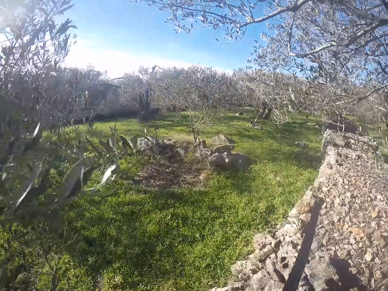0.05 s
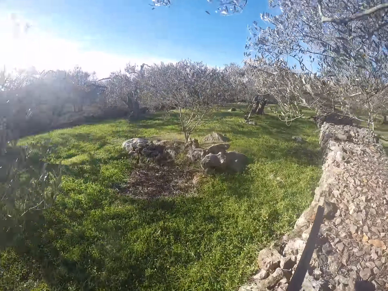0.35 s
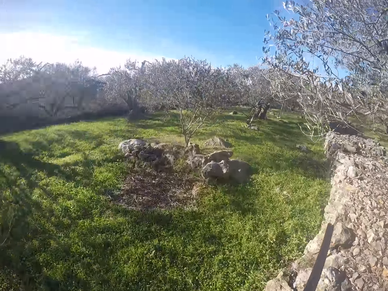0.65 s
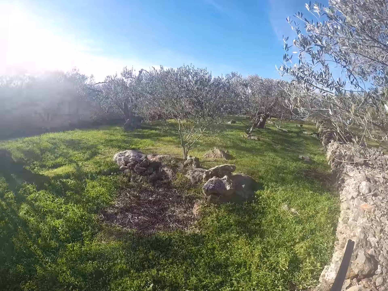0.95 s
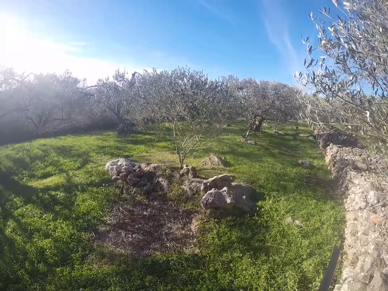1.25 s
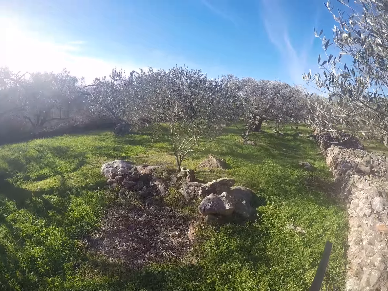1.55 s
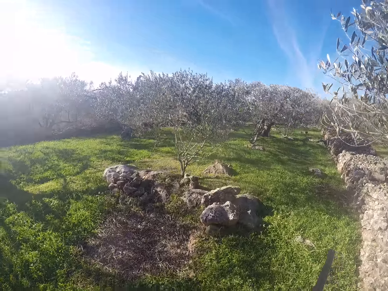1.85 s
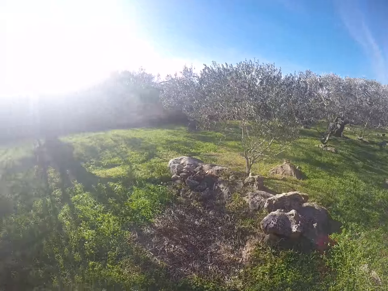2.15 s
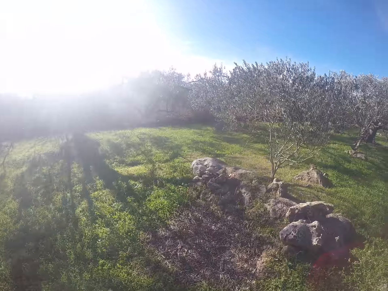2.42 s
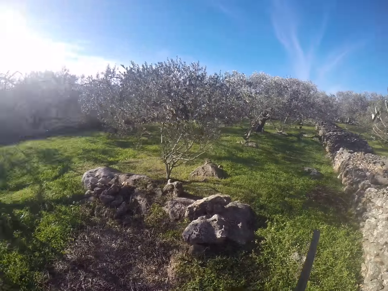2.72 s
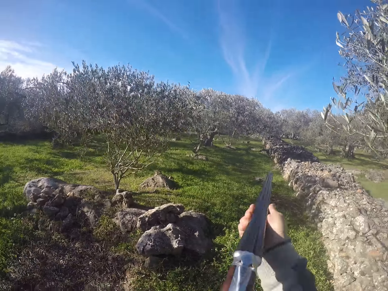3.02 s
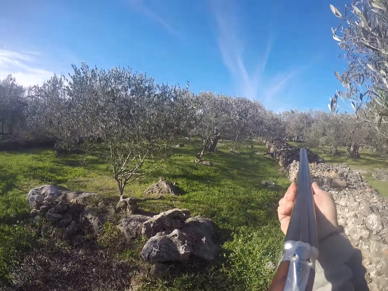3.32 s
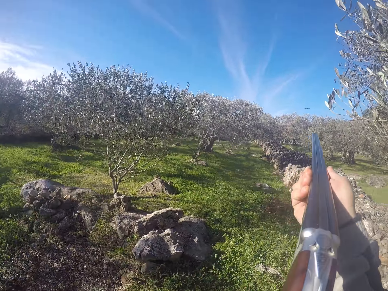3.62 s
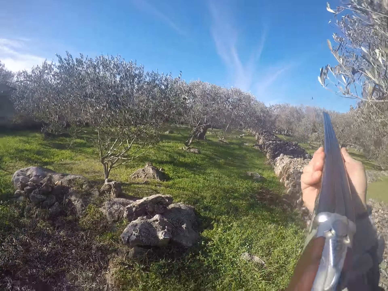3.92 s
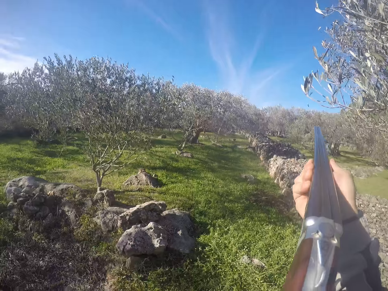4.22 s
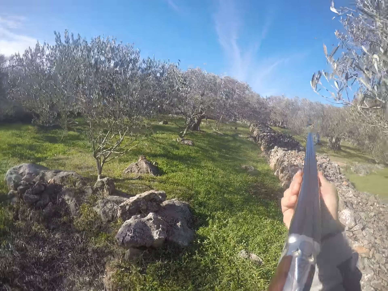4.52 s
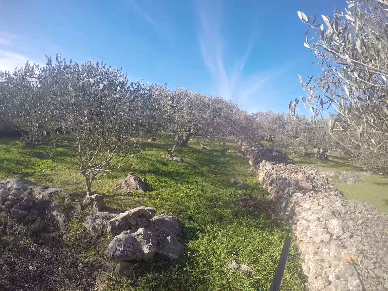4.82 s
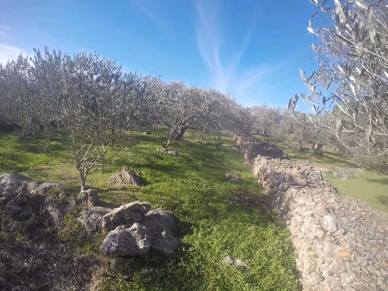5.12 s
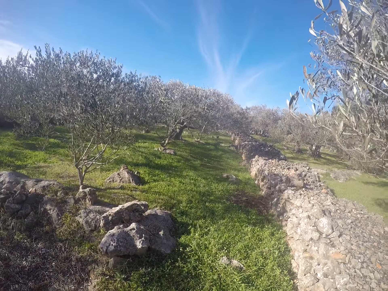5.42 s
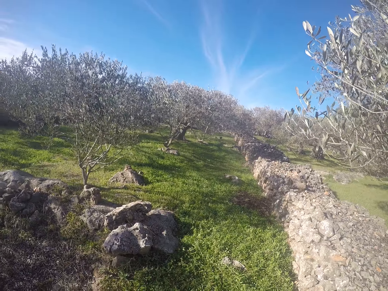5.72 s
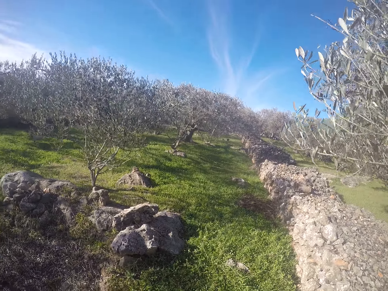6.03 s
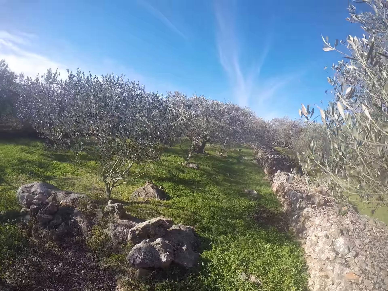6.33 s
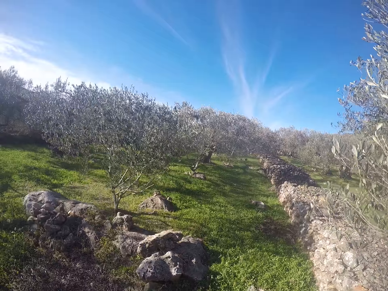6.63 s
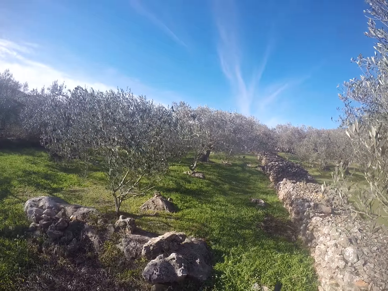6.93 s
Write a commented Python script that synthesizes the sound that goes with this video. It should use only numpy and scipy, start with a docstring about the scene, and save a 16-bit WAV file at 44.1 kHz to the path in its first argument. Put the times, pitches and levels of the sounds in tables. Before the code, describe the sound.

In an open grove, a bird whistles faintly while low wind gusts buffet a microphone worn by the shooter. A jacket rustles softly as a gun is raised. Two very loud, close shotgun blasts crack about half a second apart, overloading the microphone and echoing away through the trees. A sleeve swishes with a soft bump as the gun comes down, and the wind rumble grows stronger.

```python
'''Wind eddies buffet the microphone of a small camera on a hunter's head while birds whistle in an olive grove.
His jacket rustles by stick-slip friction as he raises a shotgun. At 3.9 s and 4.4 s the hammer clacks
and a blast overloads the microphone, then rolls away through the trees; the gain ducks and recovers.
He lowers the gun with a swish of his sleeve. Near 6 s the strongest gusts arrive, and leaves hiss.'''
import sys
import numpy as np
from scipy import signal
from scipy.fft import rfft, irfft, next_fast_len
from scipy.io import wavfile
from scipy.ndimage import uniform_filter1d, minimum_filter1d

SR = 44100
rng = np.random.default_rng(int(sys.argv[2]) if len(sys.argv) > 2 else 0)


def put_to_file(sound):
    """Save the sound as 16-bit audio at rate SR, in the file named by the first command-line argument."""
    columns = np.atleast_2d(sound).T  # one column per channel
    safe = np.clip(columns, -1, 1)
    whole_steps = np.round(safe * 32767)
    wavfile.write(sys.argv[1], SR, whole_steps.astype(np.int16))


N = 315844
TIME = np.arange(N) / SR

# the two shots: (time [s], crack [dB], ring frequency [Hz], ring [dB], thump [dB], echo [dB])
SHOTS = [(3.9134, 17.5, 1350, 19, 19, 1.5), (4.440, 16, 2978, 18.5, 15.5, 2)]


def from_db(db):
    """Amplitude ratio: a factor of ten for every 20 dB."""
    return 10 ** (np.asarray(db) / 20)


def rms_one(x):
    """Normalisation to unit rms."""
    return x / np.sqrt(np.mean(x ** 2) + 1e-20)


def noise(spectrum, grain_db=0):
    """Spectral shaping of white noise to (frequency [Hz], relative level [dB]); unit rms."""
    white = rng.standard_normal(N) * from_db(grain_db * rng.standard_normal(N))  # uneven, so grainy
    hz, db = np.transpose(spectrum)
    size = next_fast_len(N)
    log_f = np.log(np.maximum(np.arange(size // 2 + 1) * SR / size, 1))
    beyond_ends = np.abs(log_f - np.clip(log_f, np.log(hz[0]), np.log(hz[-1])))
    gain = from_db(np.interp(log_f, np.log(hz), db) - 20 * beyond_ends)
    return rms_one(irfft(rfft(white, size) * gain, size)[:N])


def drift(rate_hz):
    """Random modulation: linear interpolation between Gaussian values."""
    knots = rng.standard_normal(N // 20)
    return np.interp(TIME * rate_hz, np.arange(len(knots)), knots)


def steady(x, span_s):
    """Division by the running rms evens out the swells of a noise."""
    return x / np.sqrt(uniform_filter1d(x ** 2, max(int(span_s * SR), 2)) + 1e-4)


def lowpass(x, hz):
    """Second-order low-pass filtering."""
    return signal.sosfilt(signal.butter(2, hz, fs=SR, output="sos"), x)


def swell(peak_s, length):
    """Gaussian envelope, within about 4 dB of its peak for the given length."""
    return np.exp(-2 * np.minimum(((TIME - peak_s) / length) ** 2, 20))


def decay(start, t60, rise=1e-4):
    """Exponential damping: an envelope that rises at start and falls 60 dB in t60 seconds."""
    out, at = np.zeros(N), slice(*np.searchsorted(TIME, [start, start + 2 * t60]))
    age = TIME[at] - start
    out[at] = (1 - np.exp(-age / rise)) * np.exp(-np.log(1000) * age / t60)
    return out


def noise_floor():
    """Broadband noise of still air under the pure tones of the camera's electronics."""
    # still air: (frequency [Hz], relative level [dB])
    air_spectrum = [(200, -1), (500, -4), (850, -6), (1200, -5), (2200, -6.5), (3500, -8), (6000, -12.5),
                    (12500, -19), (15500, -21.5)]
    # electronic whine: (frequency [Hz], rms level [dB])
    tones = [(6233.7, -71), (12467.4, -80)]
    whine = sum(from_db(db) * np.sqrt(2) * np.sin(2 * np.pi * hz * TIME) for hz, db in tones)
    return from_db(-63.5) * noise(air_spectrum) + whine


def leaves():
    """Friction of olive leaves brushing past: one swell of thin hiss."""
    # leaf hiss: (frequency [Hz], relative level [dB])
    spectrum = [(1000, -6), (2000, -9), (2950, -10), (3200, 0.5), (3500, -15), (4400, -12), (6000, -17.5)]
    return from_db(-66) * swell(6.35, length=0.5) * noise(spectrum) * from_db(2 * drift(40))


def whistle(notes, waver):
    """Frequency modulation: pure tones glide, fastest at first; the wider the glide, the more it wavers."""
    out, wobble = np.zeros(N), waver * drift(94)
    for start, length, start_hz, end_hz, start_db, end_db in notes:
        at = np.flatnonzero((TIME >= start) & (TIME < start + length))
        progress = np.linspace(0, 1, len(at))
        hz = start_hz * (end_hz / start_hz) ** (progress ** .85 + wobble[at])
        edges = np.minimum(np.minimum(progress, 1 - progress) * length / 0.0017, 1)
        level = from_db(start_db + (end_db - start_db) * progress)
        out[at] += edges * level * np.sin(2 * np.pi * np.cumsum(hz) / SR)
    return out


def birds():
    """One bird sings its phrase twice and farther ones flicker; the trees add faint reverberation."""
    # near bird: (time [s], length [s], start pitch [Hz], end pitch [Hz], start level [dB], end level [dB])
    near_notes = [(.55, 0.15, 2280, 2015, -51.5, -67.5), (.70, 0.11, 2215, 2220, -52, -52),
                  (.808, 0.14, 2615, 2620, -50.5, -56.5), (.943, 0.13, 2560, 2410, -58.5, -53.5)]
    # farther birds, before their level flickers: same columns
    far_notes = [(0, 0.81, 2344, 1845, -61.5, -79), (1.8, 0.18, 2800, 1770, -63.5, -60),
                 (2.05, 0.077, 2510, 2490, -66, -58), (2.17, 0.15, 2820, 2470, -66.5, -64),
                 (2.36, 0.39, 2455, 2040, -60, -66)]
    phrase = whistle(near_notes, waver=.05)
    repeat = from_db(-2) * np.interp(TIME - 1.655, TIME, phrase)
    distant = whistle(far_notes, waver=.025) * from_db(3 * drift(45) - 2)
    song = phrase + repeat + distant
    trees = rng.standard_normal(N) * decay(0, t60=0.29, rise=0.011)
    return song + from_db(-9) * signal.fftconvolve(song, trees / np.linalg.norm(trees))[:N]


def wind():
    """Turbulence at the microphone port: large eddies rumble and shed quicker buffeting."""
    # large eddies: (frequency [Hz], relative level [dB])
    rumble_spectrum = [(12, -14), (22, 1.5), (36, -1), (60, -7), (90, -20), (150, -40.5)]
    # small eddies: (frequency [Hz], relative level [dB])
    buffet_spectrum = [(50, -10), (90, 3.5), (130, -5.5), (200, -17.5), (300, -24.5), (500, -34),
                       (1000, -46), (2500, -66)]
    # gusts: (peak time [s], length [s], rumble level [dB], extra buffeting [dB])
    gusts = [(0.358, 0.28, -34, -2), (1.3, .16, -36.5, -3.5), (1.86, 0.12, -40, 6.5),
             (2.263, 0.13, -29, -13), (2.515, 0.29, -27, -0.5), (2.734, 0.23, -26, 0.5),
             (3.122, 0.2, -21, 1.5), (3.6, 0.57, -33, 2), (4.125, 0.17, -29, 5.5), (4.946, 0.17, -21, -3),
             (5.33, 0.71, -29.5, 0.5), (5.8, .1, -20.5, -8), (5.989, .13, -12, 1), (6.14, .12, -12, -3),
             (6.36, 0.22, -17, 0), (6.767, 0.19, -28.5, -4), (7.174, 0.042, -18.5, 1)]
    breeze_db, buffet_db = -44, -56  # rumble and buffeting between gusts
    buffet_slope = 0.79  # dB of buffeting per dB of rumble
    rumble_power, buffet_power = from_db(breeze_db) ** 2, from_db(buffet_db) ** 2
    for peak_s, length, db, extra_db in gusts:
        gust = from_db(db - breeze_db) * swell(peak_s, length)
        rumble_power += (from_db(breeze_db) * gust) ** 2
        buffet_power += (from_db(buffet_db + extra_db) * gust ** buffet_slope) ** 2
    rumble = steady(noise(rumble_spectrum), 0.11)
    swirl = np.sqrt(uniform_filter1d(rumble ** 2, int(.02 * SR)) + .05)
    buffet = swirl * steady(noise(buffet_spectrum), 0.061)
    return np.sqrt(rumble_power) * rumble + np.sqrt(buffet_power) * buffet


def jacket():
    """Stick-slip friction: in each movement the cloth catches and slips in quick, rasping jerks."""
    # movements of body and arms: (time [s], length [s], level [dB], slip interval [s])
    moves = [(0.352, .13, -64.5, 0.053), (0.748, .03, -63, 0.07), (0.934, .12, -65.5, 0.071),
             (1.851, .23, -63.5, .065), (2.614, .03, -61, .06), (2.884, .17, -48, 0.064),
             (3.066, .32, -49, 0.0585), (3.414, .27, -58, 0.065), (3.804, .09, -57.5, 0.052)]
    # rasp of the cloth: (frequency [Hz], relative level [dB])
    spectrum = [(300, -17.5), (520, -15), (750, -2.5), (1000, -9), (1330, -12.5), (1650, 1), (1860, 1.5),
                (2100, -17.5), (2400, -3.5), (3000, -18), (4500, -22.5), (8000, -35), (14000, -42)]
    jitter_s, slip_s, spread_db = .002, .058, 1.0
    jerks = np.zeros(N)
    for start, length, db, interval in moves:
        chances = rng.standard_normal((16, 2))
        for time, (late, strong) in zip(np.arange(start, start + length, interval), chances):
            offset = 2 * (TIME - time - jitter_s * late) / slip_s
            at = np.abs(offset) < 4
            release = np.where(offset[at] > -.25, 1, .45)  # steps up as the cloth lets go
            jerks[at] += from_db(db + spread_db * strong) * np.exp(-1.3 * offset[at] ** 2) * release
    return jerks * steady(noise(spectrum, grain_db=2.5), 0.018) * from_db(2.7 * drift(300))


def gear_clicks():
    """Light impacts of gun and gear: bright, quickly damped transients."""
    # clicks: (time [s], level [dB])
    clicks = [(.2744, -66), (3.046, -50), (3.1714, -55), (3.6024, -69), (4.127, -37), (4.629, -42)]
    envelope = sum(from_db(db) * decay(time, t60=0.016) for time, db in clicks)
    return envelope * noise([(1500, -5), (3500, 9.5), (7500, 8), (14000, -19)])


def sleeve():
    """Sliding friction: the sleeve swishes as the gun comes down."""
    # swish: (frequency [Hz], relative level [dB])
    spectrum = [(700, -15), (1200, -10), (1700, 3), (2000, 5), (2400, -7), (3100, 8), (3600, -8),
                (4200, 3.5), (5200, -34), (6600, -15), (7400, -29), (8200, -27), (12000, -46)]
    return from_db(-19.5) * noise(spectrum) * decay(4.685, t60=0.21, rise=0.025)


def stock_bump(hz=124):
    """A soft impact excites only low frequencies: the stock bumps the shoulder."""
    thud = steady(noise([(hz / 2, -8), (hz, 0), (hz * 2, -24)]), 0.025)
    return from_db(-20.5) * thud * decay(4.69, t60=0.34, rise=0.021)


def hammer(lead_s=0.0061):
    """Impact on steel: the hammer clacks just before each shot leaves the muzzle."""
    # ring of the steel: (frequency [Hz], relative level [dB])
    spectrum = [(700, -9), (1800, -5.5), (3100, 0), (5000, -8), (9000, -10.5), (14000, -16.5)]
    strikes = sum(decay(time - lead_s, t60=.04) for time, *_ in SHOTS)
    return from_db(-19.5) * noise(spectrum) * strikes


def grove_echoes():
    """Reflection and scattering: ground, wall and trees return each blast, then a far echo rolls on."""
    # nearby scatter: (frequency [Hz], relative level [dB])
    scatter_spectrum = [(100, 4), (250, -1.5), (400, -6.5), (600, -15), (850, -9.5), (1200, 0.5),
                        (1900, -3), (2300, -4), (3300, -6), (4500, -10.5), (5500, -13.5), (10000, -20.5),
                        (15000, -27)]
    # low boom of the grove: (frequency [Hz], relative level [dB])
    boom_spectrum = [(40, -11), (90, 6.5), (160, -1), (250, -12.5), (500, -28.5)]
    # far echo: (frequency [Hz], relative level [dB])
    far_spectrum = [(300, -15.5), (800, -12.5), (1130, 2), (1500, -3), (1900, -4.5), (2400, -7.5),
                    (3200, -9), (3800, -18), (4400, -14), (5500, -28.5), (9000, -44)]
    # strong reflections from wall and trees: (delay [s], relative level [dB])
    reflections = [(.04, -27), (0.081, -22.5), (.135, -38), (.187, -38.5), (0.258, -53)]
    scatter = noise(scatter_spectrum, grain_db=6)
    boom = steady(noise(boom_spectrum), .03)
    # longer paths through the foliage lose their treble and arrive in clumps
    dull = rms_one(lowpass(noise(scatter_spectrum, grain_db=6), 4500)) * from_db(2.5 * drift(110))
    far = noise(far_spectrum) * from_db(2 * drift(35))
    out = np.zeros(N)
    for time, *_, echo_db in SHOTS:
        echo = from_db(-13) * scatter * decay(time, t60=0.21, rise=0.0024)
        echo += from_db(-24) * dull * decay(time, t60=.48, rise=.01)
        echo += from_db(-32.5) * scatter * decay(time, t60=.5, rise=.02)  # leaves throw back a sizzle
        echo += from_db(-10) * boom * decay(time, t60=0.28, rise=.015)
        echo += dull * sum(from_db(db) * decay(time + lag, t60=0.098, rise=.004) for lag, db in reflections)
        echo += from_db(-41.5) * far * decay(time, t60=2.3, rise=0.11)
        out += from_db(echo_db) * echo
    return out


def thump(start, hz=130.98, crest_s=0.0061, settle_hz=34):
    """Damped oscillation: the pressure wave swings the microphone briefly, then it settles slowly."""
    out, at = np.zeros(N), slice(*np.searchsorted(TIME, [start, start + .5]))
    age = TIME[at] - start
    pulse = (age / crest_s * np.exp(1 - age / crest_s)) ** 4
    settle = from_db(-12) * decay(start, t60=.17)[at] * np.sin(2 * np.pi * settle_hz * age)
    out[at] = pulse * np.sin(2 * np.pi * hz * age) + settle
    return out


def muzzle_blasts():
    """Direct sound of each pressure impulse: a broadband crack, a brief ring and a low thump."""
    # muzzle crack: (frequency [Hz], relative level [dB])
    spectrum = [(100, -7.5), (330, -3.5), (500, -11.5), (750, -7), (1400, 0.5), (2100, -6), (3300, -2.5),
                (5500, -9), (10000, -14.5), (15000, -28)]
    crack = steady(noise(spectrum), 0.0025)
    out = np.zeros(N)
    for time, crack_db, ring_hz, ring_db, thump_db, _ in SHOTS:
        ring_band = [(ring_hz / 2, -26), (ring_hz * 0.82, 0), (ring_hz * 1.15, 0), (ring_hz * 2, -28)]
        out += from_db(crack_db) * crack * (decay(time, t60=0.02) + from_db(-14) * decay(time, t60=0.081))
        out += from_db(ring_db) * steady(noise(ring_band), 0.0023) * decay(time, t60=0.018)
        out += from_db(thump_db) * thump(time)
    return out


def scene():
    """Superposition of all sources in one channel."""
    mix = muzzle_blasts() + grove_echoes() + jacket() + birds() + gear_clicks() + sleeve() + stock_bump()
    return (mix + leaves() + wind() + noise_floor() + hammer())[None]


def gain_control(x, threshold_db, depth_db, hold_s, release_db_per_s, attack_s):
    """Automatic gain control: an overload turns the gain down; it is held, then creeps back."""
    excess_db = np.clip(20 * np.log10(np.abs(x) + 1e-9) - threshold_db, 0, depth_db)
    size = int(hold_s * SR) | 1
    held_db = -minimum_filter1d(-excess_db, size, origin=size // 2)
    cut_db = np.maximum.accumulate(held_db + release_db_per_s * TIME) - release_db_per_s * TIME
    pole = np.exp(-1 / (attack_s * SR))
    return x * from_db(-signal.lfilter([1 - pole], [1, -pole], cut_db))


def record(dry):
    """Gain control, soft saturation and band limiting: a gentle treble roll-off, then a steep cut."""
    ducked = gain_control(dry[0], threshold_db=-3.5, depth_db=12, hold_s=0.56,
                          release_db_per_s=16.5, attack_s=0.00027)
    saturated = .92 * ducked / (1 + ducked ** 4) ** .25
    steep_cut = signal.cheby2(16, 70, 16200, fs=SR, output="sos")
    return signal.sosfilt(steep_cut, lowpass(saturated, 15500))[None]


dry = scene()
out = record(dry)
put_to_file(out)
```